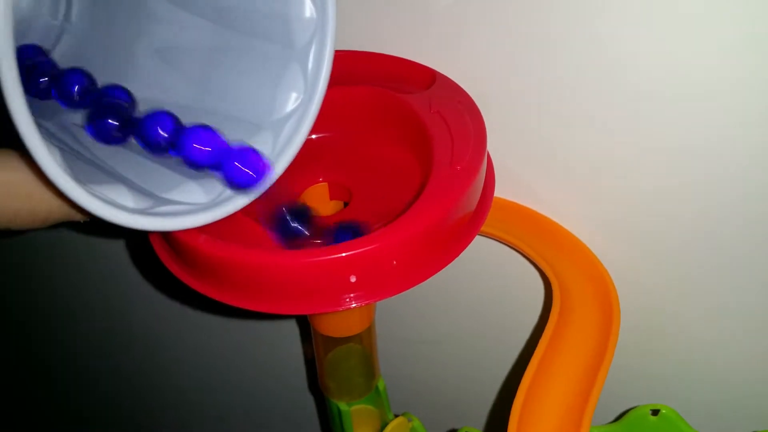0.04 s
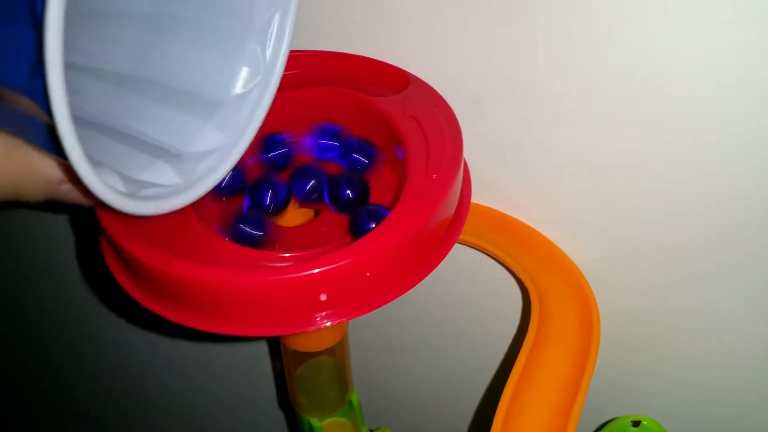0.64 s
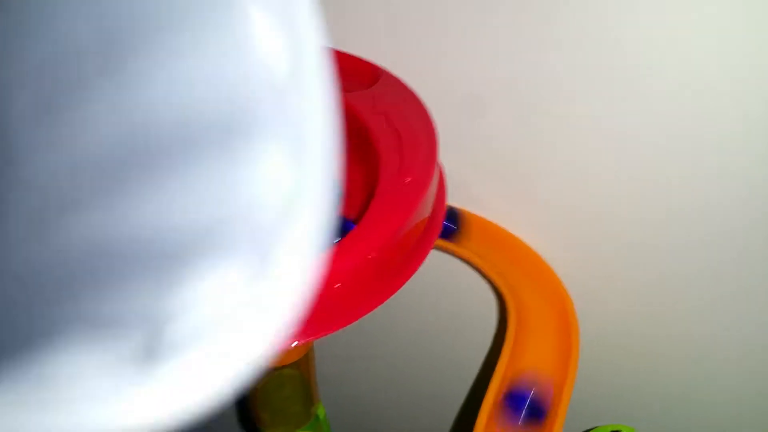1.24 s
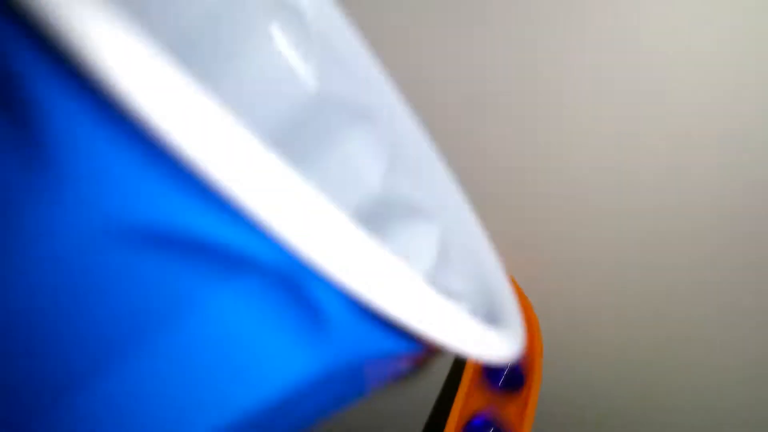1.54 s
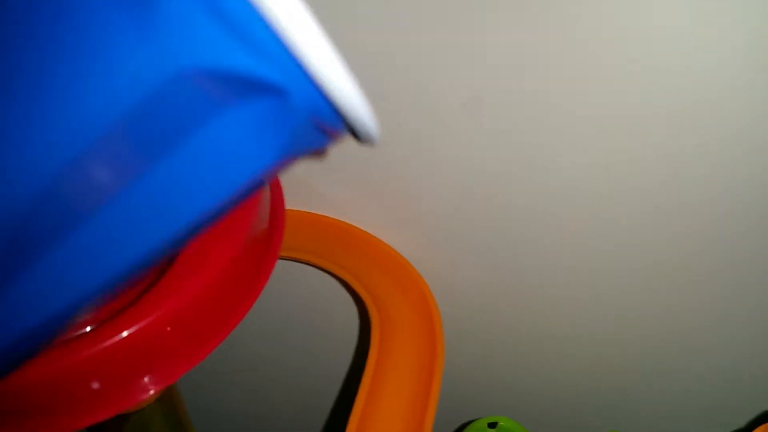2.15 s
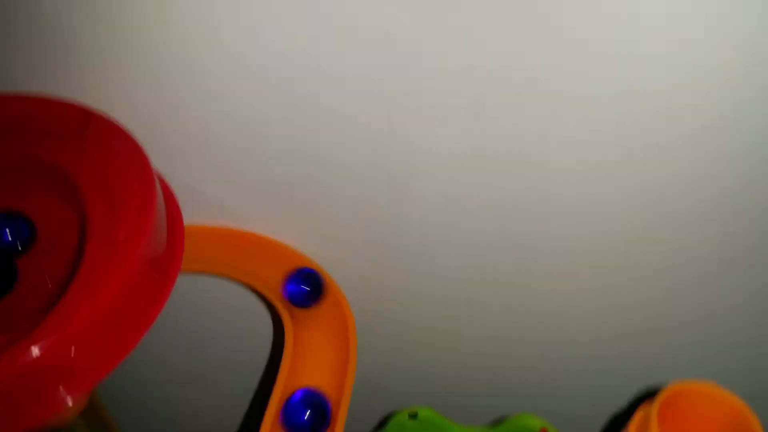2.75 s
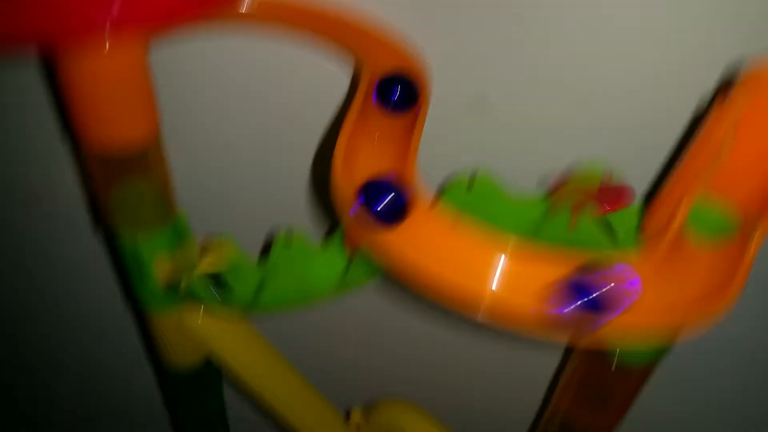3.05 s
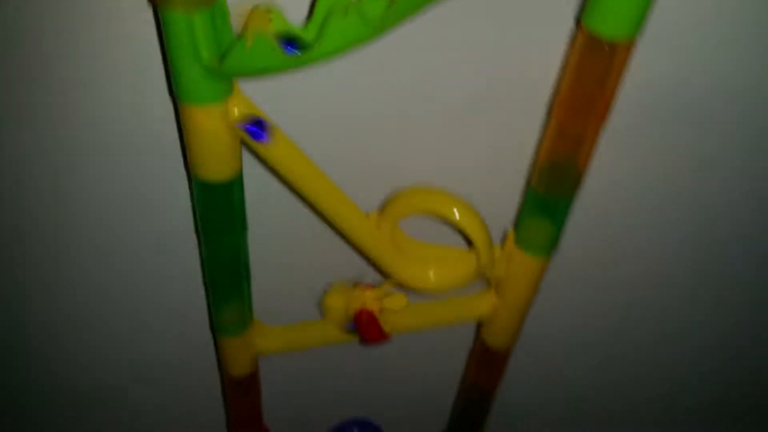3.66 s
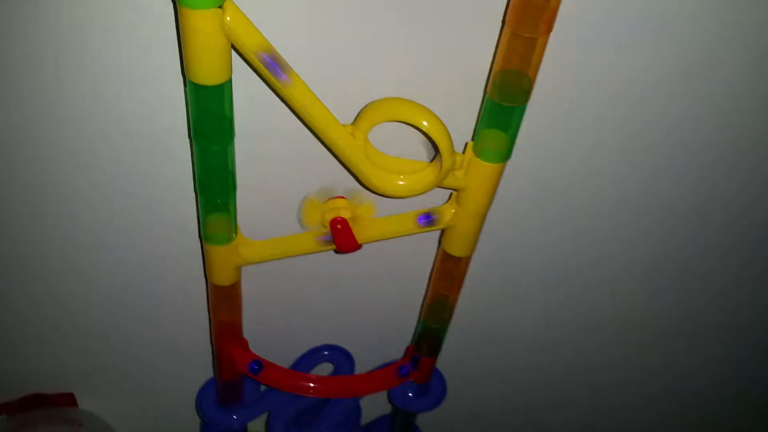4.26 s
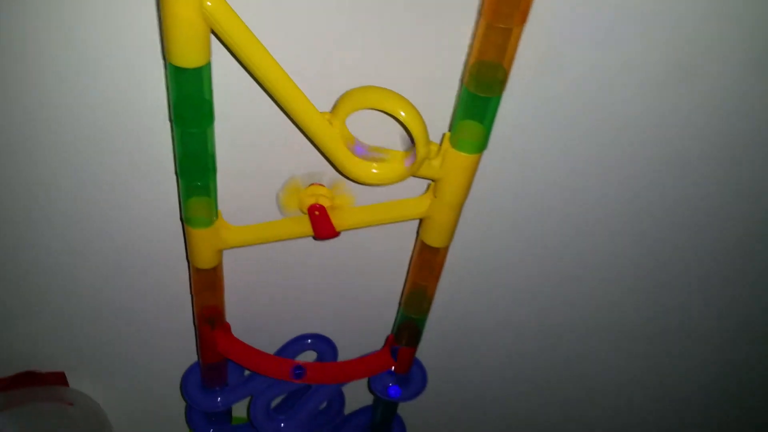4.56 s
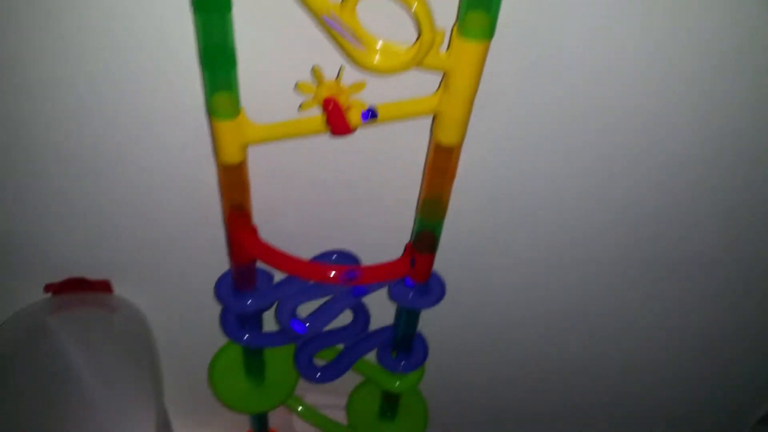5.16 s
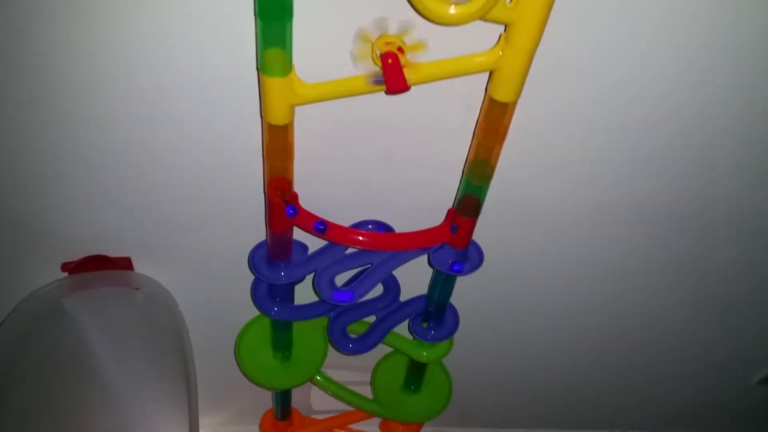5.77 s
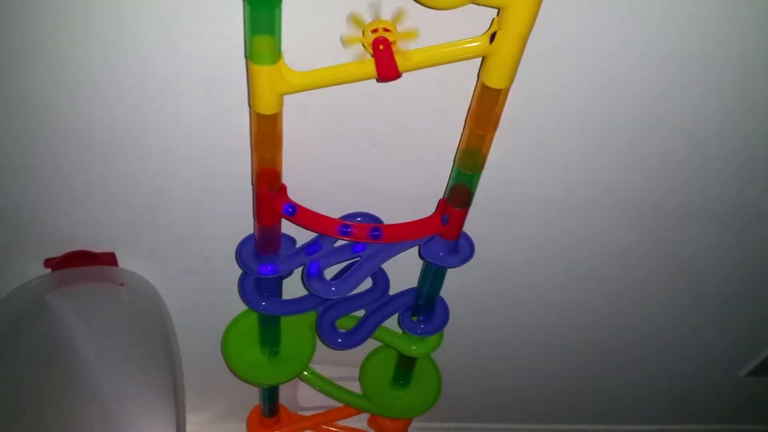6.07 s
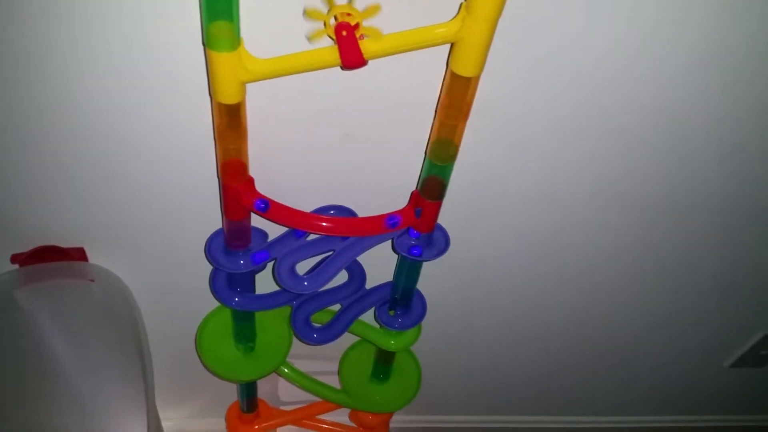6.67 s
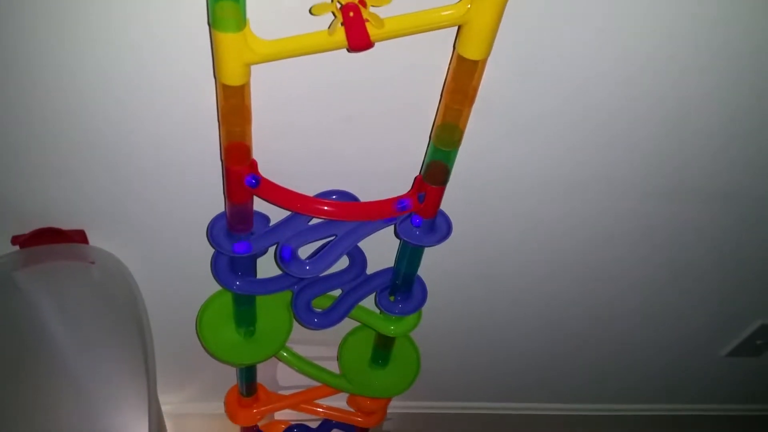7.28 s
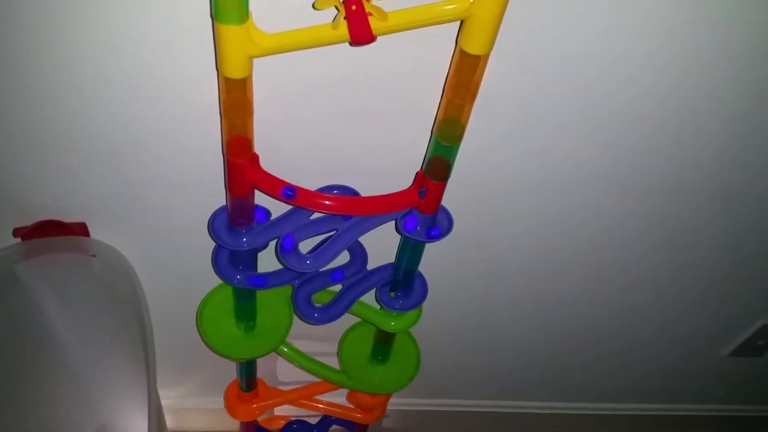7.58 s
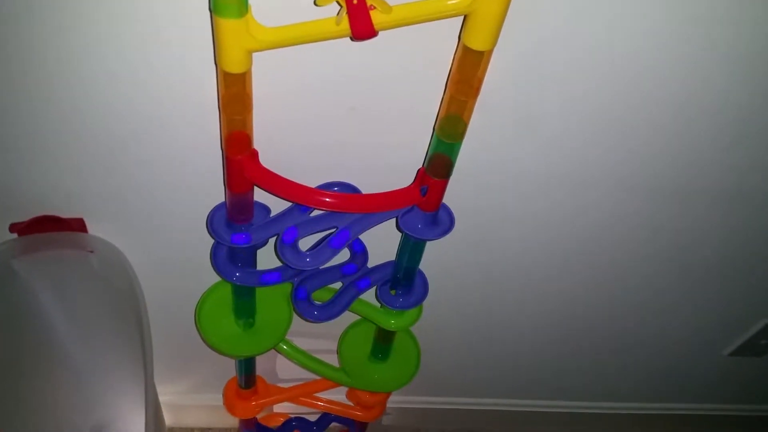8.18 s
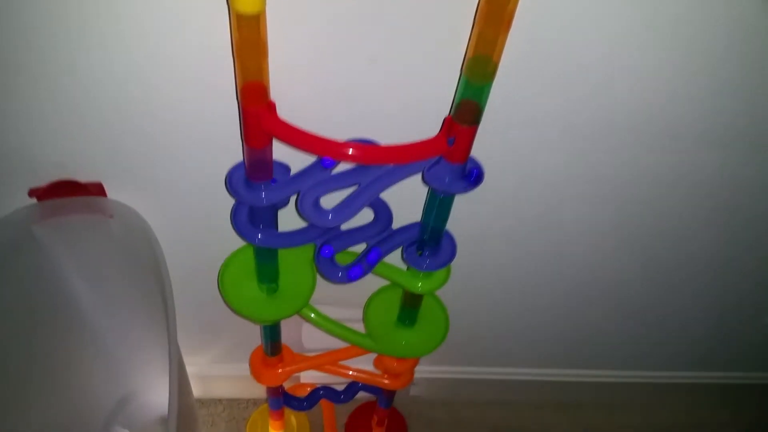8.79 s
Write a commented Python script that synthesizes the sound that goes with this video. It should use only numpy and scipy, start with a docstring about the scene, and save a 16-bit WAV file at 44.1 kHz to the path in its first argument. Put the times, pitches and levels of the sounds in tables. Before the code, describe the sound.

Right at the start, glass marbles are tipped from a tub into a plastic funnel: a hollow rumble with a dense burst of bright clicks, fading by about 1 second. Scattered knocks follow, and near 1.9 seconds the tub gives a soft, low bump as it is taken away. From 2 to 3.5 seconds the clicking grows busy again as marbles hit each other and roll along the track. From about 3.5 to 6 seconds they drop through tubes and a paddle wheel, with irregular rattling knocks that ring the thin plastic. After 6 seconds they run through a winding maze, with slightly lower clacks and swells of jostling over a fine rolling patter. The strikes thin briefly around 8.5 seconds, then pick up near 9 with a faint handling rumble. Everything sounds close, in a small, quiet room with little echo.

```python
"""A small, quiet room. Glass marbles are tipped from a tub into the funnel of a plastic marble run,
then drop through tubes and a paddle wheel into a winding maze. Glass on glass gives bright clicks;
glass on thin plastic gives lower knocks that ring the wall modes. Under them runs the chatter of
rolling and jostling. The tub rumbles as it empties and bumps as it is taken away."""
import sys
import numpy as np
from scipy import signal
from scipy.fft import rfft, irfft, next_fast_len
from scipy.io import wavfile
from scipy.ndimage import uniform_filter1d

SR = 44100
rng = np.random.default_rng(int(sys.argv[2]) if len(sys.argv) > 2 else 0)


def waveform_to_disk(signal):
    """Save audio, clipped to [-1, 1], as 16-bit WAV at the path in sys.argv[1]."""
    frames = np.transpose(np.atleast_2d(signal))
    scaled = np.clip(frames, -1, 1) * 32767
    samples = np.round(scaled).astype(np.int16)
    wavfile.write(sys.argv[1], SR, samples)


N = 398223
HIT_SAMPLES, BAND_LIMIT_HZ = 4096, 16200
CLACK_HZ, GLASS_HZ = 2929, 4526
SINGLE_RATTLE_DB = -10.5  # rattle after a single strike

# Table levels are relative.
# marbles leaving the tub: t/s, level/dB
POUR_LEVEL = [(0, -37), (.75, -49), (1.2, -61), (2.4, -92)]
# pour spectrum: f/Hz, level/dB
POUR_SPECTRUM = [(40, -28), (110, -4.5), (290, -4.0), (700, -7.0), (4000, -19.5)]
# tub wall modes: f/Hz, width/Hz, level/dB
TUB_WALL_MODES = [(282, 53, 10.5), (508, 85, 12.5)]
# hollow tub notes: t/s, f/Hz, level/dB
TUB_NOTES = [(0.002, 648, -28), (0.008, 905, -30), (0.568, 800, -28)]
# rolling patter: t/s, level/dB
ROLL_LEVEL = [(0, -34.5), (1.15, -49.5), (2.4, -44), (4, -43), (7.8, -37.5), (8.42, -37), (8.54, -39)]
# rolling spectrum: f/Hz, level/dB
ROLL_SPECTRUM = [(60, -14.5), (330, -11.5), (405, 9), (520, 1), (700, 9.5), (2100, 5), (5000, -8),
                 (15000, -31)]
# chatter between collisions: t/s, level/dB
JOSTLE_LEVEL = [(0.0, -30.5), (0.48, -26.5), (0.8, -39), (0.98, -62), (1.48, -42), (2.31, -34.5),
                (3.29, -36.5), (3.67, -38), (6.04, -34), (6.39, -39.5), (6.79, -27.5), (7.09, -65),
                (7.44, -27.5), (8.02, -62), (8.7, -50), (8.9, -34), (9.03, -26.5)]
# starts of funnel, tubes, maze: t/s
PART_STARTS_S = [0, 3.45, 6.13]
# impact spectrum of each part: f/Hz, level/dB
FUNNEL_SPECTRUM = [(50, -33), (270, -9.5), (780, -8), (950, 3), (2200, 3), (3100, 3), (5300, -2.5),
                   (8000, -9), (10500, -10.5), (15500, -26)]
TUBE_SPECTRUM = [(80, -30), (430, -14.5), (720, -10), (1000, -3), (1500, -4), (2900, 0), (5500, -2.5),
                 (8000, -8.5), (10000, -6.5), (15500, -23.5)]
MAZE_SPECTRUM = [(70, -25), (400, -6), (1000, 7), (1950, 8.5), (3000, 8), (3500, 5), (5400, -0.5),
                 (8000, -1.5), (9900, -1.5), (12000, -6.5), (15500, -14.5)]
# wall modes of each part: f/Hz, width/Hz, level/dB
FUNNEL_WALL_MODES = [(298, 7.2, -1), (961, 13, -4), (1633, 23, 2), (7200, 260, -6)]
TUBE_WALL_MODES = [(428, 17, 11.5), (582.4, 7.2, 8), (2050, 250, -4), (2830, 210, -4.5)]
MAZE_WALL_MODES = [(404, 47, 7.5), (587, 12.4, 12), (2010, 130, 1), (2960, 86, -1.5), (5320, 740, -3),
                   (9820, 550, -0.5)]
# glass on glass: t/s, level/dB
GLASS_CLICKS = [(0.0486, -14), (0.061, -6.5), (0.1106, -7), (0.1704, -6), (0.2348, -4), (0.352, -6),
                (0.3678, -10), (0.3997, -6), (0.469, -11), (0.6211, -5.5), (0.679, -13.5), (0.7259, -13),
                (0.773, -14), (0.8432, -11.5), (1.085, -30), (1.093, -30), (1.1958, -17), (1.7381, -22),
                (1.8381, -16), (1.8793, -12.5), (1.8943, -27), (1.913, -16.5), (2, -19.5), (2.0507, -17),
                (2.1196, -19.5), (2.1533, -8.5), (2.1945, -10.5), (2.2219, -5.5), (2.2648, -9),
                (2.277, -15), (2.7577, -8.5), (2.8108, -12), (2.868, -19), (2.902, -6), (3.0163, -21),
                (3.037, -13.5), (3.122, -16), (3.2194, -6.5), (3.324, -9), (3.337, -11.5), (3.381, -13),
                (3.3928, -8), (3.4317, -11.5), (3.444, -7.5), (3.79, -17.5), (3.864, -19), (4.2498, -18),
                (4.489, -12), (4.653, -19.5), (4.7782, -14), (4.998, -19), (5.042, -17), (5.074, -12.5),
                (5.2866, -13.5), (5.583, -12), (5.5882, -12.5), (5.6733, -15.5), (6.3647, -21),
                (6.393, -19.5), (6.8273, -10.5), (7.7502, -24), (8.841, -18), (8.8537, -12),
                (8.9351, -15.5)]
# glass on plastic: t/s, level/dB
WALL_KNOCKS = [(0.0459, -4), (0.098, -14.5), (0.2418, -15), (0.3056, -6), (0.334, -15), (0.4405, -8.5),
               (0.464, -16.5), (0.504, -10), (0.5333, -7), (0.59, -14), (0.658, -12.5), (0.804, -16),
               (0.868, -15), (0.884, -16), (0.9133, -14.5), (1.1609, -19.5), (1.2112, -18.5),
               (1.2253, -13.5), (1.2529, -21), (1.4708, -20.5), (1.5879, -17), (1.6556, -12.5),
               (2.2948, -12), (2.408, -16), (2.422, -13), (2.4729, -14.5), (2.5119, -16.5), (2.537, -14.5),
               (2.556, -13.5), (2.5797, -9.5), (2.6485, -14), (2.6844, -13), (2.724, -6.5), (2.8355, -18),
               (2.863, -13.5), (2.9612, -10.5), (2.986, -10.5), (3.1398, -11), (3.1575, -10),
               (3.1862, -16.5), (3.206, -18), (3.2724, -12), (3.5013, -15.5), (3.5743, -22), (3.8473, -19),
               (3.9167, -11.5), (4.182, -8.5), (4.194, -9), (4.346, -16), (4.3822, -15), (4.474, -14),
               (4.709, -18), (5.353, -21), (5.384, -18), (5.4882, -23), (5.53, -13), (5.7067, -18),
               (5.8495, -12.5), (5.9735, -15), (6.077, -20), (6.0891, -10), (6.1595, -6.5), (6.2657, -11),
               (6.478, -20), (6.5853, -11.5), (6.6418, -14.5), (6.6749, -14), (6.6923, -8), (6.911, -10),
               (6.9479, -6), (6.9901, -11), (7.028, -14.5), (7.0714, -22.5), (7.18, -27), (7.255, -12.5),
               (7.3432, -16.5), (7.3754, -23), (7.458, -17.5), (7.488, -17), (7.5712, -13), (7.6627, -13.5),
               (7.778, -21), (7.8821, -16.5), (7.894, -17), (8.2607, -18.5), (8.2962, -7.5), (8.333, -12),
               (8.3896, -17), (8.427, -17.5), (8.578, -30.5), (8.6832, -20), (8.7621, -17.5),
               (8.814, -14.5), (8.9484, -13.5)]
# drops onto the next piece: t/s, level/dB, rattle/dB
DROPS = [(0.839, -11, -9), (0.9674, -23, 7.5), (1.1765, -10, -2.5), (1.5725, -10, -1), (2.0747, -11, -2),
         (2.3625, -6.5, -11), (2.5752, -8.5, -17), (2.632, -7, -11.5), (3.056, -10.5, -2.5),
         (3.097, -10.5, -5), (3.5403, -13.5, 0), (3.712, -9, -8.5), (3.86, -12, -0.5), (3.9, -12, -14),
         (3.968, -12.5, -4.5), (4.0319, -9, -7.5), (4.4397, -13, -0.5), (4.5576, -9, -4.5),
         (4.6304, -7.5, -6), (4.7205, -8.5, -5.5), (4.7621, -12.5, 4.5), (4.8714, -8.5, -8.5),
         (5.1023, -16.5, 6), (5.1384, -10.5, -5.5), (5.1616, -9, -7), (5.214, -13.5, -0.5),
         (5.244, -12, -13), (5.2982, -12, 1), (5.54, -11.5, 1.5), (5.685, -13.5, 4), (5.7731, -16, 8),
         (5.8891, -6, -7.5), (5.9821, -15, -3.5), (5.995, -10, -4), (6.039, -11.5, -5.5),
         (6.5136, -12.5, -0.5), (6.561, -13.5, 1), (6.6058, -15.5, 4.5), (6.7442, -15.5, -4.5),
         (6.85, -12.5, -3.5), (7.234, -21, -1), (7.283, -11.5, -2), (7.415, -11, -9), (7.523, -9, -7),
         (7.8307, -10, -10), (8.7276, -11.5, -15.5), (8.7906, -13.5, -16), (8.959, -13, -3)]
# handling rumble: t/s, level/dB
HANDLING_LEVEL = [(0, -61), (1.4, -66.5), (1.65, -53), (1.83, -53), (1.86, -41.5), (2.03, -54), (2.22, -58),
                  (2.45, -74), (8.65, -70), (8.95, -51.5)]
# handling spectrum: f/Hz, level/dB
HANDLING_SPECTRUM = [(25, -16), (70, 2.5), (130, 5.5), (280, -1), (450, -1), (3000, -35)]
# still room air: f/Hz, level/dB
AIR_SPECTRUM = [(38, -16), (56, 8), (72, 3.5), (200, 5.5), (1000, -3.5), (16000, -33)]
# room decay: f/Hz, T60/s
ROOM_T60_S = [(3000, 0.16), (15000, 0.084)]
# microphone balance: f/Hz, left minus right/dB
MIC_BALANCE = [(900, 0), (1850, -1), (2400, -8), (5000, -6.5), (7200, -10.5), (10500, -6), (13000, 1),
               (15500, 3)]
# microphone crossfeed: f/Hz, left-right correlation
MIC_CORRELATION = [(500, 0.85), (950, 0.53), (1500, 0.052), (3000, 0.029)]


def gain(db):
    """dB to amplitude."""
    return 10 ** (np.asarray(db) / 20)


def unit_rms(x):
    """Scale to rms 1."""
    return x / np.sqrt(np.mean(x ** 2) + 1e-20)


def at_hz(points, hz):
    """Interpolate over log frequency."""
    f, value = np.transpose(points)
    return np.interp(np.log(hz + 1), np.log(f + 1), value)


def envelope(curve):
    """dB curve to gain per sample."""
    return gain(np.interp(np.arange(N) / SR, *np.transpose(curve)))


def add(mix, at_s, sound):
    """Mix in place, cut at the end."""
    part = mix[:, max(round(at_s * SR), 0):][:, :sound.shape[1]]
    part += sound[:, :part.shape[1]]


def min_phase(db):
    """Response with this gain and no pre-ringing."""
    cepstrum = irfft(db * np.log(10) / 20)
    cepstrum[..., 1:HIT_SAMPLES // 2] *= 2
    cepstrum[..., HIT_SAMPLES // 2 + 1:] = 0
    return np.exp(rfft(cepstrum))


def noise(spectrum):
    """Stereo coloured noise, rms 1."""
    size = next_fast_len(N)
    shape = gain(at_hz(spectrum, np.fft.rfftfreq(size, 1 / SR)))
    white = rfft(rng.standard_normal((2, size)))
    return unit_rms(irfft(white * shape, size)[:, :N])


def ring_walls(x, modes):
    """Input plus the plastic wall modes it drives."""
    out = x.copy()
    for hz, width_hz, db in modes:
        radius = np.exp(-np.pi * width_hz / SR)
        pole = radius * np.exp(2j * np.pi * hz / SR)
        out += 2 * gain(db) * signal.lfilter([1 - radius], [1, -pole], x).real
    return out


def pulse(t):
    """Contact envelope: fast rise, then the wall's waves scatter and die."""
    age = np.maximum(t, 0) / .0008
    return age * np.exp(-age)


def collisions(knock_hz=CLACK_HZ, wall_scatter_oct=0.1575, glass_scatter_oct=0.35):
    """All strikes, pitch varying with the spot hit: t/s, level/dB, f/Hz, rattle/dB."""
    clicks = [(s, db, SINGLE_RATTLE_DB) for s, db in GLASS_CLICKS]
    knocks = [(s, db, SINGLE_RATTLE_DB) for s, db in WALL_KNOCKS] + DROPS
    kinds = [(clicks, GLASS_HZ, glass_scatter_oct), (knocks, knock_hz, wall_scatter_oct)]
    return [(s, db, hz * 2 ** (scatter_oct * rng.uniform(-1.036, 1)), rattle_db)
            for rows, hz, scatter_oct in kinds for s, db, rattle_db in rows]


def pour(thump_db=-28, thump_s=0.016, landed_s=1.6):
    """Marbles rumble out of the tub; each landing thumps the funnel."""
    power, t = envelope(POUR_LEVEL)[None] ** 2, np.arange(HIT_SAMPLES) / SR
    for s, db, _, _ in collisions():
        if s < landed_s:
            add(power, s, (gain(db + thump_db) * np.exp(-t / thump_s)[None]) ** 2)
    return np.sqrt(power) * unit_rms(ring_walls(noise(POUR_SPECTRUM), TUB_WALL_MODES))


def tub_notes(rise_s=0.0044):
    """Marbles run over the thin tub: short, hollow, wavering notes."""
    out, t = np.zeros((2, N)), np.arange(HIT_SAMPLES) / SR
    swell = t / rise_s * np.exp(1 - t / rise_s)
    for s, hz, db in TUB_NOTES:
        waver = 1 + 0.25 * uniform_filter1d(rng.standard_normal((2, HIT_SAMPLES)), size=60)
        phase = 2 * np.pi * np.cumsum(hz * waver, axis=1) / SR
        add(out, s, gain(db) * swell * np.sin(phase))
    return out


def impact(spectrum, pitch_hz, hard_db, rattle_db, ping_db, ring_s=0.019, linger_s=0.004,
           pivot_hz=3500, damp_hz=4000):
    """One collision: crack, four rebounds, hollow ping, damped ring of thin plastic."""
    t, hz = np.arange(HIT_SAMPLES) / SR, np.fft.rfftfreq(HIT_SAMPLES, 1 / SR)
    crack_noise, ring = rng.standard_normal((2, 2, HIT_SAMPLES))
    delays_s = np.cumsum(rng.uniform(0.00272, .014, 4))
    sizes = rng.uniform(0.08, 1, 4) * np.exp(-delays_s / 0.033)
    rebounds = gain(rattle_db - 5) * sizes / np.linalg.norm(sizes) @ pulse(t - delays_s[:, None])
    crack = rfft(crack_noise * pulse(t))
    power = uniform_filter1d(np.mean(abs(crack) ** 2, axis=0), size=160)
    crack *= min_phase(-10 * np.log10(power / power.mean()))  # brief contact: flat spectrum
    crack *= 1j * hz / (0.59 * pitch_hz + 1j * hz)  # slow wall: thin bass
    ring *= np.exp(-t / ring_s) * gain(rattle_db / 2 - 17)
    # two local resonances, Q 7; the ring spans the whole part and keeps less of them
    spot_hz = CLACK_HZ * 2 ** np.clip(rng.normal([0, 1], [.6, .5]), -1.4, 2)[:, None]
    resonances = 1 / (1 + 2j * 7 * (hz / spot_hz - 1))
    spot_db = 20 * np.log10(abs(1 + resonances.sum(axis=0)))
    clack = (crack + rfft(crack_noise * rebounds)) * min_phase(spot_db)
    clack += rfft(ring) * min_phase(.5 * spot_db) / (1 + 1j * hz / damp_hz)
    tilt_db = hard_db * np.tanh(np.log2((hz + 1) / pivot_hz))  # harder: shorter, brighter
    clack *= min_phase(at_hz(spectrum, hz) + tilt_db)
    onset = SR // 250  # first 4 ms set the level
    midband = irfft(clack * ((hz > 2200) & (hz < 6500)))[:, :onset]
    linger = gain(-25) * np.exp(-t / linger_s) * np.minimum(t * 1000, 1)
    ping = (pulse(t) + rebounds + linger) * np.sin(2 * np.pi * (pitch_hz * t + rng.random((2, 1))))
    ping *= gain(ping_db) / np.std(ping[:, :onset])
    return (irfft(clack) / np.std(midband) + ping) / np.hypot(1, gain(ping_db))


def chatter(spectrum, per_s, hard_db, rattle_db=-13, spread_db=3.0, variants=40):
    """Small marble touches at random times, rms 1."""
    onsets = np.flatnonzero(rng.random(N) < per_s / SR)
    sizes = gain(spread_db * np.minimum(rng.exponential(1, N), 2))
    kinds = rng.integers(0, variants, N)
    pitches_hz = CLACK_HZ * 2 ** rng.normal(0, 0.48, variants)
    touches = [impact(spectrum, hz, hard_db + offset_db, rattle_db, ping_db=-5.5)
               for hz, offset_db in zip(pitches_hz, np.linspace(-4, 4, variants))]
    out = np.zeros((2, N))
    for i in onsets:
        add(out, i / SR, sizes[i] * touches[kinds[i]])
    return unit_rms(out)


def track_contact(dip=0.58):
    """Chatter dips while marbles are airborne, longer before a harder strike."""
    touching, t = np.ones(N), np.arange(N) / SR
    for s, db, *_ in collisions():
        flight_s = 0.012 * gain(0.47 * (db + 16))
        touching[np.searchsorted(t, s - flight_s):round(s * SR)] = 1 - dip
    return uniform_filter1d(touching, size=100)


def rolling():
    """Fine patter of marbles along the channels."""
    level = gain(-4.5) * envelope(ROLL_LEVEL) * track_contact()
    return level * chatter(ROLL_SPECTRUM, per_s=800, hard_db=0.5)


def jostling(spectrum, ticks_db, crowded_db=-28, flurry_db=-13, rise_s=0.0023, settle_s=0.057):
    """Collisions stir nearby marbles: they patter on plastic and, crowded, tick on each other."""
    t, power = np.arange(SR // 2) / SR, envelope(JOSTLE_LEVEL)[None] ** 2
    flurry = (1 - np.exp(-t / rise_s)) * np.exp(-t / settle_s)
    for s, db, _, rattle_db in collisions():
        add(power, s, (gain(db + flurry_db + rattle_db) * flurry[None]) ** 2)
    stir = np.sqrt(power[0])
    crowding = stir / (stir + gain(crowded_db))
    patter = chatter(spectrum, per_s=300, hard_db=-4.0)
    ticks = gain(ticks_db) * crowding * chatter(spectrum, per_s=73, hard_db=8.5, rattle_db=-27)
    return stir * track_contact() * (patter + ticks)


def track_part(start_s, end_s, spectrum, modes, hits_db, ping_db, jostle_db, ticks_db, left_db,
               knock_hz=CLACK_HZ):
    """Strikes and jostling on one part of the run, ringing its walls."""
    hits, t = np.zeros((2, N)), np.arange(N) / SR
    for s, db, pitch_hz, rattle_db in collisions(knock_hz):
        if start_s <= s < end_s:
            hard_db = 0.5 + 3 * np.log2(pitch_hz / CLACK_HZ)  # briefer contact: higher and brighter
            clean_db = ping_db - 0.22 * (rattle_db - SINGLE_RATTLE_DB)  # more rattle, less ping
            add(hits, s, gain(db + hits_db) * impact(spectrum, pitch_hz, hard_db, rattle_db, clean_db))
    gate = uniform_filter1d(((t >= start_s) & (t < end_s)).astype(float), size=2000)
    jostle = gain(jostle_db) * gate * jostling(spectrum, ticks_db)
    return ring_walls(hits + jostle, modes) * gain([[left_db / 2], [-left_db / 2]])


def handling():
    """Low handling rumble; the tub bumps as it is taken away."""
    return envelope(HANDLING_LEVEL) * noise(HANDLING_SPECTRUM)


def reflections(first_s=0.0033, per_s=4000, lowpass_hz=9000):
    """Sparse echoes; the room's walls absorb treble first."""
    size = SR * 6 // 10
    taps = rng.choice([-1., 1.], (2, size)) * (rng.random((2, size)) < per_s / SR)
    taps *= np.arange(size) > first_s * SR
    hz, t, frames = signal.stft(taps, SR, nperseg=256)
    decay = gain(-60 * t / at_hz(ROOM_T60_S, hz)[:, None])
    echoes = signal.istft(frames * decay, SR, nperseg=256)[1]
    echoes /= np.linalg.norm(echoes, axis=1, keepdims=True)
    return signal.lfilter(*signal.butter(1, lowpass_hz, fs=SR), echoes)


def room(x, wet_db=-6, places=8):
    """Marbles sound from changing places: cycle through a set of reflections for each."""
    place, wet = np.arange(N) // 512 % places, np.zeros((2, N))
    for k in range(places):
        share = np.sqrt(np.maximum(uniform_filter1d((place == k) * 1., size=256), 0))
        wet += signal.fftconvolve(x * share, reflections(), axes=1)[:, :N]
    return x + gain(wet_db) * wet


def scene():
    """Track and tub notes in the room, plus pour, handling and still air."""
    funnel_s, tubes_s, maze_s = PART_STARTS_S
    funnel = track_part(funnel_s, tubes_s, FUNNEL_SPECTRUM, FUNNEL_WALL_MODES,
                        hits_db=-7.5, ping_db=-4, jostle_db=-5, ticks_db=2.5, left_db=-1)
    tubes = track_part(tubes_s, maze_s, TUBE_SPECTRUM, TUBE_WALL_MODES,
                       hits_db=-7.5, ping_db=-3.5, jostle_db=2, ticks_db=-2.5, left_db=2)
    maze = track_part(maze_s, N / SR, MAZE_SPECTRUM, MAZE_WALL_MODES,
                      hits_db=-8, ping_db=-3, jostle_db=-1, ticks_db=0, left_db=1, knock_hz=2487)
    track = funnel + tubes + maze + rolling()
    return handling() + room(track + tub_notes()) + pour() + gain(-62.5) * noise(AIR_SPECTRUM)


def record(dry):
    """Two microphone ports share bass, differ in treble; then clip and band limit."""
    size = next_fast_len(N + HIT_SAMPLES)
    hz, channels = np.fft.rfftfreq(size, 1 / SR), rfft(dry, size)
    angle = np.arcsin(at_hz(MIC_CORRELATION, hz)) / 2
    ports = np.cos(angle) * channels + np.sin(angle) * channels[::-1]
    balance = gain(np.outer([.5, -.5], at_hz(MIC_BALANCE, hz)))
    balance /= np.sqrt(np.mean(balance ** 2, axis=0))
    heard = irfft(ports * balance, size)[:, :N]
    lowpass = signal.firwin(255, BAND_LIMIT_HZ, window=("kaiser", 9), fs=SR)
    return signal.oaconvolve(np.clip(heard, -1, 1), lowpass[None], "same")


dry = scene()
out = record(dry)
waveform_to_disk(out)
```